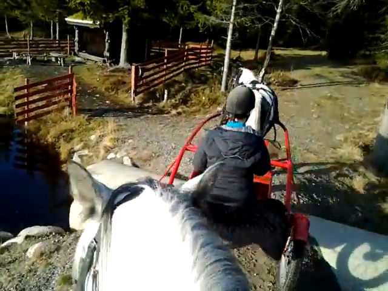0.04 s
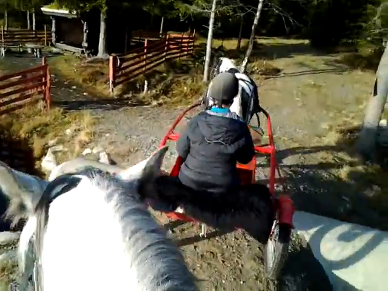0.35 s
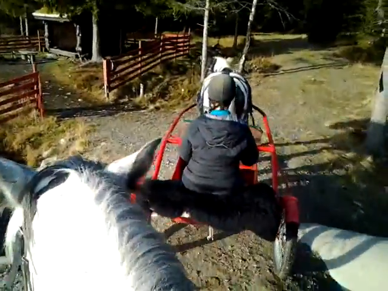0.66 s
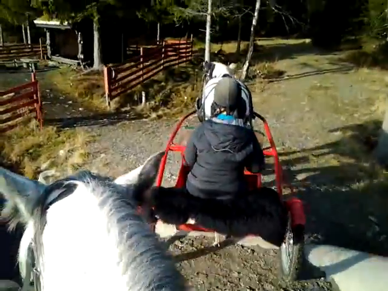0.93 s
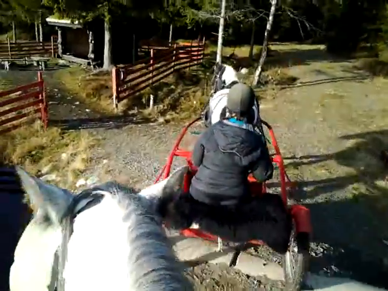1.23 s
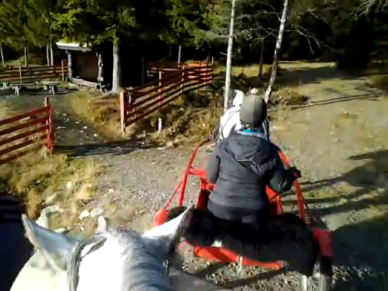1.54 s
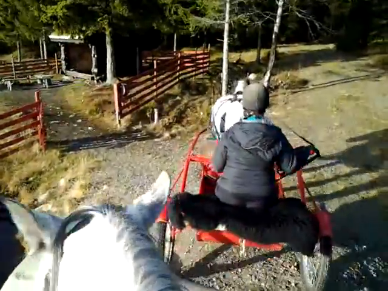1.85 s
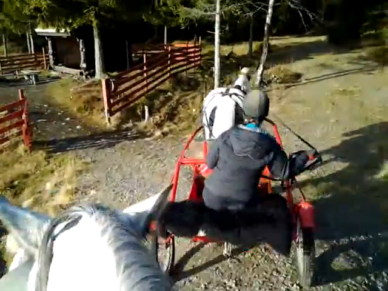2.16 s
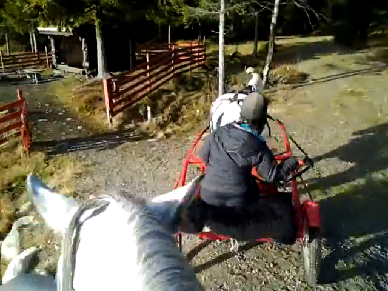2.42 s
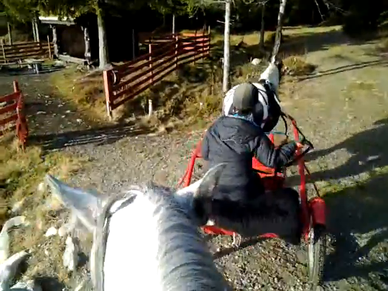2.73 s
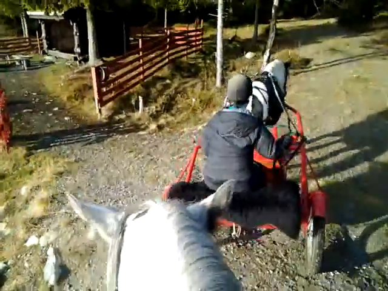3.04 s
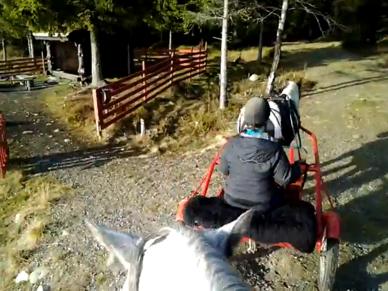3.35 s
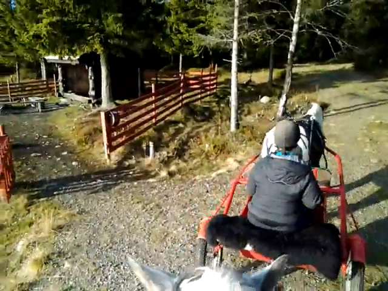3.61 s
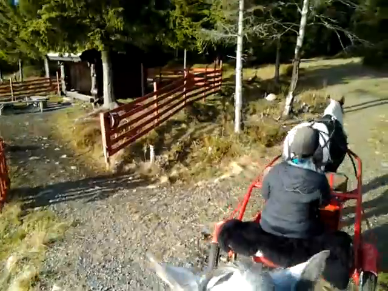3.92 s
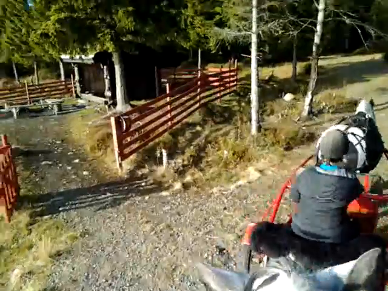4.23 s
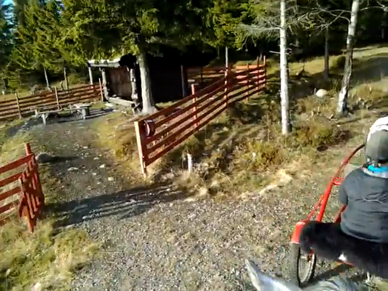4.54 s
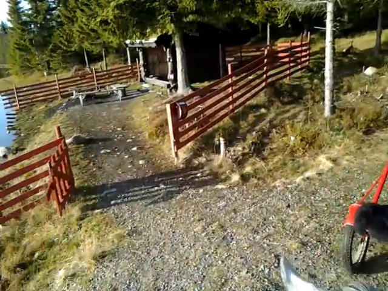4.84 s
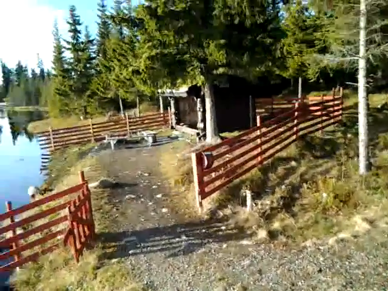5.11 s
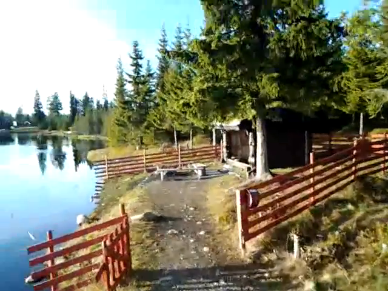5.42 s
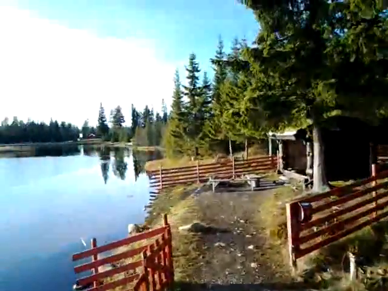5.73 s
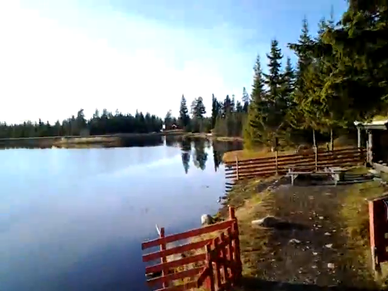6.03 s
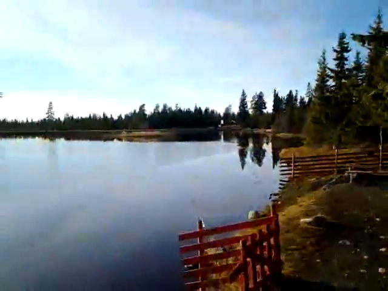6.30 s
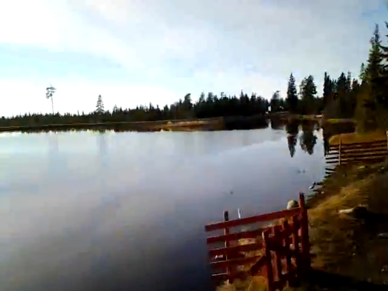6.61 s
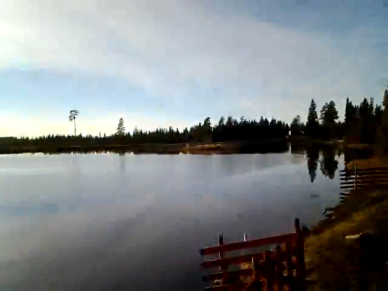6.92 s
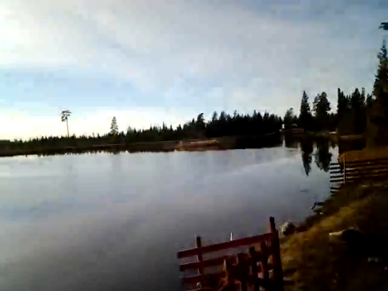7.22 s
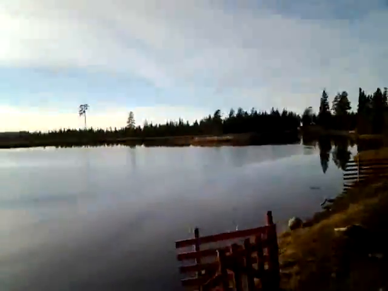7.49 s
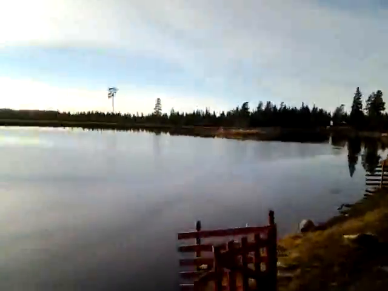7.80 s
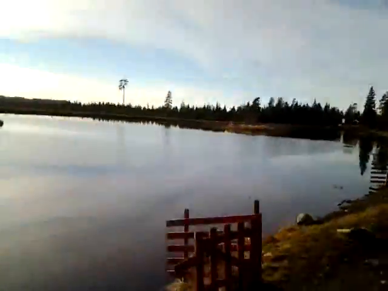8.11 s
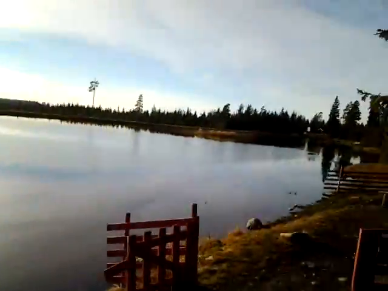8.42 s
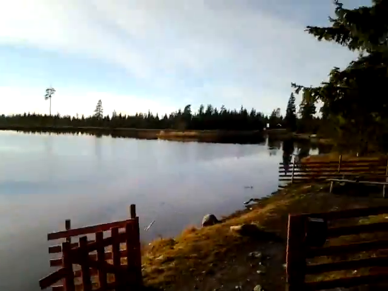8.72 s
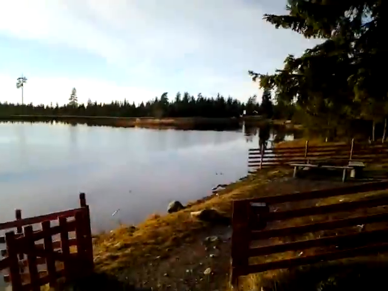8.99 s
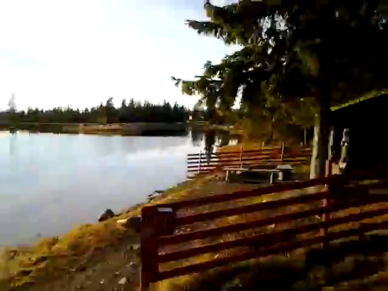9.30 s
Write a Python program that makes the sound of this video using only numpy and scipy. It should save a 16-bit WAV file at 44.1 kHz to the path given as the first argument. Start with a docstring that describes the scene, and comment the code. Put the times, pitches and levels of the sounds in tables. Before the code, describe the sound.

Cart tyres roll over an outdoor gravel path from the start, making a steady, gritty rush dotted with sharp pebble snaps. Hooves knock and crunch into the stones at uneven intervals throughout, with stronger hollow knocks at about 2, 4.1, 6.7 and 9.4 seconds. Water rushes softly underneath. At 3.2 seconds loose metal on the cart gives one light, rattling clank. A few low wind pops touch the microphone from about 4 seconds, and a rumble builds near 5.5 seconds. The tyres then fade slightly as the cart draws away, and the water becomes clearer. Between 6.3 and 8.4 seconds gusts buffet the microphone with fluttering thumps, strongest around 7.5 seconds. The harness gives three faint, very short creaks near 6.8, 7.9 and 9 seconds. The wind eases, while hooves, gravel and water continue to the end at about 9.5 seconds.

```python
"""Horse cart on a lakeside gravel path

Tyres crush grit and snap pebbles aside; hooves knock hollow and crunch into the stones.
Loose metal on the cart clanks once, tack creaks by stick-slip, and the tyres fade as it draws away.
Water rushes at the lake's outlet; wind off the lake buffets the microphone with gusts and eddies."""
import sys
import numpy as np
from scipy import signal
from scipy.fft import rfft, irfft, next_fast_len
from scipy.io import wavfile
from scipy.ndimage import map_coordinates

SR = 44100
rng = np.random.default_rng(int(sys.argv[2]) if len(sys.argv) > 2 else 0)


def transcribe(u):
    """Save the signal u as a 16-bit wav file named by the first command-line argument.

    u: samples, shape (n,) or (channels, n), limited to [-1, 1]; the rate is SR.
    q: integer samples, one column per channel.
    """
    v = np.clip(np.atleast_2d(u).T, -1, 1)
    q = np.round(v * 32767).astype(np.int16)
    wavfile.write(sys.argv[1], SR, q)


N = 421155

# tyre noise: time_s, rolling_db, sand_db
TYRE_LEVELS = [(0.0, -47, -54.5), (0.64, -45.5, -51.5), (1.2, -45.5, -53), (1.62, -43.5, -51.5),
               (1.85, -45.5, -49), (2.15, -44, -49.5), (2.93, -45.5, -53.5), (4.31, -45, -56),
               (4.89, -45.5, -55.5), (5.85, -47, -55), (6.75, -46, -54), (7.24, -49.5, -55.5),
               (8.32, -44, -54), (8.85, -46.5, -54.5), (9.39, -44, -53), (9.55, -43.5, -54.5)]


def amp(db):
    return 10 ** (np.asarray(db) / 20)


def unit_rms(x):
    return x / np.sqrt(np.mean(x ** 2) + 1e-20)


def curves(rows):
    """Each column after time_s, interpolated per sample."""
    times_s, *columns = np.transpose(rows)
    return [np.interp(np.arange(N) / SR, times_s, column) for column in columns]


def wobble(rate_hz):
    """Smooth random curve through knots at rate_hz."""
    knots = rng.standard_normal(int(N * rate_hz / SR) + 4)
    return map_coordinates(knots, [np.arange(N) * rate_hz / SR])


def filtered(x, response):
    """Zero-phase filter with gain response(hz)."""
    size = next_fast_len(N + SR // 2)
    return irfft(rfft(x, size) * response(np.fft.rfftfreq(size, 1 / SR)), size)[:N]


def coloured(x, spectrum):
    """Shape x by (freq_hz, gain_db) points, falling off past both ends; rms 1."""
    freq_hz, gain_db = np.transpose(spectrum)
    freq_hz = np.r_[freq_hz[0] / 2, freq_hz, freq_hz[-1] * 2]
    gain_db = np.r_[gain_db[0] - 20, gain_db, -120]
    return unit_rms(filtered(x, lambda hz: amp(np.interp(np.log(hz + 1), np.log(freq_hz + 1), gain_db))))


def resonance(x, hz, q):
    """Two-pole band-pass."""
    return signal.lfilter(*signal.iirpeak(min(hz, SR / 5), max(q, 0.6), SR), x)


def grains(rate_hz, spread_db):
    """Random tiny impacts of unequal size; rms 1."""
    hits = rng.random(N) < rate_hz / SR
    sizes = amp(spread_db * np.minimum(rng.standard_exponential(N), 3.2))
    return unit_rms(hits * sizes * rng.choice([-1, 1], N))


def add(track, start_s, sound):
    start = max(round(start_s * SR), 0)
    track[start:start + len(sound)] += sound[:N - start]


def ping(modes, pitch_hz, rise_s, crack_db):
    """One short contact: a dry crack and a few damped modes; peak 1."""
    t = np.arange(SR // 25) / SR
    ring = 0
    for ratio, db, t60_s in modes:
        mode_hz = pitch_hz * ratio * (1 + rng.normal(0, 0.055))
        ring += amp(db - 60 * t / t60_s) * np.sin(2 * np.pi * mode_hz * t)
    crack_t60_s = modes[0][2]
    noise = unit_rms(resonance(rng.standard_normal(len(t)), pitch_hz, q=0.61))
    crack = amp(crack_db - 60 * t / crack_t60_s) * noise
    attack = 1 - np.exp(-t / rise_s)
    # contact lasts about a cycle, softening the treble
    contact = resonance((ring + crack) * attack, 1.19 * pitch_hz, q=0.6)
    return contact / np.abs(contact).max()


def distance_loss_db(time_s, leaves_s=5.73, db_per_s=1.3):
    """Tyre sounds fade as the cart draws away."""
    return db_per_s * np.maximum(time_s - leaves_s, 0)


def tyres(roll_gain_db=3.0, sand_gain_db=1.9, lurch_db=1.4, clump_db=4.5):
    """Tyres crush countless grains, which give way in clumps; the load shifts from bump to bump."""
    # rolling noise: freq_hz, gain_db
    roll_spectrum = [(120, -10.5), (220, -7), (330, -3.5), (430, -5), (560, -3), (760, -1.5), (900, -3.5),
                     (1150, -3), (1370, -7.5), (1620, -5), (1850, -8), (2300, -7), (2680, -6.5),
                     (3100, -10.5), (3700, -14.5), (4500, -14), (5800, -15.5)]
    # sand hiss: freq_hz, gain_db
    sand_spectrum = [(2600, -32.5), (3900, -18), (4700, -7.5), (5400, -2.5), (5900, -2), (6500, -4),
                     (7000, -7.5), (7600, -8)]

    def crackle(rate_hz, spread_db):
        return amp(clump_db * np.tanh(wobble(30))) * grains(rate_hz, spread_db)

    rolling_db, sand_db = curves(TYRE_LEVELS)
    shift_db = lurch_db * wobble(22) - distance_loss_db(np.arange(N) / SR)
    grit = unit_rms(crackle(rate_hz=600, spread_db=-0.5))
    for stone_hz in (610, 1010, 1640, 2670):  # one pitch per stone size
        grit += amp(-15.5) * unit_rms(resonance(crackle(rate_hz=120, spread_db=2.0), stone_hz, q=2.5))
    stones = rng.standard_normal(N) + amp(-3) * grit
    sand = rng.standard_normal(N) + amp(-2.5) * unit_rms(crackle(rate_hz=400, spread_db=7.5))
    rolling = amp(rolling_db + roll_gain_db + shift_db) * coloured(stones, roll_spectrum)
    hiss = amp(sand_db + sand_gain_db + shift_db) * coloured(sand, sand_spectrum)
    return rolling + hiss


def water(gain_db=1.0, screened_db=-8, surge_db=4.0, surge_hz=2500):
    """A rush with fine splashes and quick surges, at first screened by the horse and a bridge."""
    # outlet flow: time_s, level_db
    flow_levels = [(0.0, -49.5), (1.57, -42), (3.51, -45.5), (3.93, -50.5), (5.05, -44.5), (5.26, -48.5),
                   (6.44, -47), (6.81, -44.5), (8.99, -42.5), (9.55, -45)]
    # rushing water: freq_hz, gain_db
    rush_spectrum = [(150, -2), (450, -3), (900, -12.5), (1400, -1.5), (1900, -1), (2600, 1), (3300, -1.5),
                     (4300, -2), (5200, -8), (6200, -16.5), (7200, -18)]
    level_db, = curves(flow_levels)
    screen_db = np.interp(np.arange(N) / SR, [3.5, 6.5], [screened_db, 0])
    splashes = rng.standard_normal(N) + amp(-1) * grains(rate_hz=700, spread_db=3.0)
    surge_gain = amp(surge_db * np.tanh(wobble(28)))
    surges = surge_gain * resonance(coloured(rng.standard_normal(N), rush_spectrum), surge_hz, q=1.9)
    rush = unit_rms(coloured(splashes, rush_spectrum) + amp(-4) * unit_rms(surges))
    return amp(level_db + gain_db + screen_db + 0.77 * wobble(14)) * rush


def wind(sway_db=-39, lumps_db=3.0, swell_db=2.4, calm_db=-54):
    """Air on the microphone: slow pressure sway, rumble, and a lumpy flutter in strong gusts."""
    # breeze between gusts: time_s, rumble_db, flutter_db
    breeze_levels = [(0.0, -58.5, -55.5), (1.2, -50, -56), (1.45, -56.5, -58), (1.62, -54, -44),
                     (1.8, -54, -57), (3.1, -54.5, -52), (4.2, -53, -51.5), (4.8, -49, -48.5),
                     (5.4, -45, -51), (5.64, -39.5, -51), (5.85, -34, -40), (6.15, -39.5, -48.5),
                     (6.5, -36, -35.5), (6.7, -38.5, -37), (7.0, -39, -42.5), (7.6, -41, -35.5),
                     (7.9, -38, -37), (8.15, -39, -38.5), (8.35, -35, -36), (8.6, -50, -49),
                     (8.8, -47, -41), (8.97, -46, -50.5), (9.2, -48, -57), (9.55, -40, -52.5)]
    # pressure spectra, each: freq_hz, gain_db
    sway_spectrum = [(2, -16), (8, -3), (12, -10.5), (20, -12), (32, -22), (70, -52.5)]
    rumble_spectrum = [(15, -13.5), (28, -9), (55, -1.5), (90, -5), (160, -17), (400, -47.5)]
    flutter_spectrum = [(50, -19.5), (95, -2.5), (180, -3), (280, -8.5), (400, -15.5), (650, -30.5),
                        (1500, -40.5)]

    def noise(spectrum):
        return coloured(rng.standard_normal(N), spectrum)

    rumble_db, flutter_db = curves(breeze_levels)
    lumps = amp(lumps_db * wobble(55))
    swell = amp(swell_db * wobble(14))
    gust = gust_envelope()
    # flutter needs air fast enough to shed eddies
    shedding = 1 / (1 + amp(calm_db - flutter_db) ** 2)
    rumble_gain = np.hypot(amp(rumble_db - 1) * swell, amp(-16) * gust)
    flutter_gain = np.hypot(amp(flutter_db - 2) * shedding * swell, amp(-2.5) * gust)
    sway = amp(sway_db) * noise(sway_spectrum)
    rumble = rumble_gain * unit_rms(lumps * noise(rumble_spectrum))
    flutter = flutter_gain * unit_rms(lumps * noise(flutter_spectrum))
    return sway + rumble + flutter


def pebble_pops(small_count=70, small_hz=1350, spread_octaves=1.2, rise_s=0.00016, crack_db=-5):
    """Pebbles snap aside: some clear ones, and small random ones whose level follows the tyres."""
    # clear snaps: start_s, peak_db, pitch_hz
    snaps = [(.046, -26.5, 2600), (.355, -31, 1420), (0.691, -22, 2830), (.839, -31, 1460),
             (1.181, -26, 2400), (1.426, -23, 4300), (1.451, -21, 4200), (1.521, -33, 2640),
             (1.74, -28, 2500), (2.029, -23, 5800), (2.144, -25.5, 2070), (2.207, -28, 2390),
             (2.227, -28, 2100), (2.814, -22.5, 2980), (2.832, -27, 3400), (2.842, -31, 3380),
             (3.461, -23, 2720), (3.695, -21.5, 950), (3.815, -27, 1880), (3.897, -28, 1840),
             (4.121, -29, 3250), (4.383, -23.5, 1200), (4.52, -31.5, 1640), (4.547, -31.5, 3090),
             (4.941, -29, 3300), (4.984, -33, 1550), (5.205, -26, 5500), (5.543, -26, 2020),
             (5.968, -25, 2110), (5.982, -22.5, 3290), (6.771, -29, 2490), (6.785, -25, 2380),
             (7.128, -25, 5010), (7.407, -31, 1770), (7.471, -28.5, 2410), (7.666, -28, 2580),
             (7.746, -26, 2570), (7.872, -27, 1770), (7.924, -26, 1810), (7.952, -18, 3210),
             (8.219, -26, 2670), (8.28, -22, 2080), (8.284, -21, 2110), (8.403, -24, 1115),
             (8.6, -27.5, 3200), (8.718, -24.5, 3570), (8.734, -30, 2750), (8.897, -27, 3290),
             (8.938, -26, 2840), (9.291, -27, 2500), (9.4184, -17.5, 2150)]
    # pebble ring: pitch_ratio, level_db, t60_s
    modes = [(0.985, -1, 0.0056), (1.8, -5, .004), (.55, -3, 0.0045)]
    out = np.zeros(N)
    for start_s, peak_db, pitch_hz in snaps:
        add(out, start_s, amp(peak_db) * ping(modes, pitch_hz, rise_s, crack_db))
    rolling_db, _ = curves(TYRE_LEVELS)
    for time_draw, size_draw, pitch_draw in rng.random((small_count, 3)):
        start_s = time_draw * N / SR
        excess_db = 13.5 + 2.2 * min(-np.log(size_draw), np.e)
        peak_db = rolling_db[int(time_draw * N)] + excess_db - distance_loss_db(start_s)
        pitch_hz = small_hz * 2 ** (spread_octaves * (2 * pitch_draw - 1))
        add(out, start_s, amp(peak_db) * ping(modes, pitch_hz, rise_s, crack_db))
    return out


def hoof_clops():
    """The hoof wall meets firm ground, heel and toe apart, and rings hollow."""
    # heel and toe contacts: start_s, peak_db, pitch_hz
    contacts = [(.046, -31.5, 910), (.24, -31, 610), (.364, -31, 1105), (.444, -33, 945),
                (.829, -31.5, 1100), (2.0475, -19, 670), (2.049, -18.5, 1000), (2.0535, -19, 630),
                (2.072, -30, 750), (2.352, -29.5, 670), (2.574, -34, 780), (2.799, -26.5, 686),
                (3.011, -21.5, 825), (3.112, -25.5, 1210), (4.08, -20, 1160), (4.086, -22.5, 447),
                (4.689, -27.5, 904), (4.796, -25, 686), (4.933, -29, 805), (5.048, -24.5, 616),
                (5.085, -26, 796), (5.151, -24.5, 385), (5.476, -32, 900), (5.485, -26, 660),
                (5.4885, -22.5, 698), (6.1977, -24.5, 544), (6.682, -15, 760), (6.694, -19, 530),
                (6.704, -20, 560), (6.7155, -18, 900), (7.456, -25, 643), (7.724, -32, 1050),
                (7.944, -30, 950), (8.249, -24, 760), (8.532, -30, 900), (8.564, -25.5, 1153),
                (8.569, -29, 697), (9.129, -30.5, 480), (9.29, -31, 1080), (9.3795, -26, 706),
                (9.382, -21, 614), (9.395, -23, 860), (9.4, -24, 850)]
    # hoof ring: pitch_ratio, level_db, t60_s
    modes = [(1, 0, 0.01), (1.8, -7.5, 0.00805), (3.7, -14, 0.0049)]
    out = np.zeros(N)
    for start_s, peak_db, pitch_hz in contacts:
        add(out, start_s, amp(peak_db) * ping(modes, pitch_hz, rise_s=0.0005, crack_db=-5.5))
    return out


def hoof_crunches(slip_rate_hz=4000, brush_t60_s=0.19, settle_t60_s=0.35):
    """Each step is a burst of slips between stones: ground thuds, hoof knocks, grit snaps and settles."""
    # steps into gravel: start_s, length_s, knock_db, knock_hz, grit_db, grit_hz
    steps = [(0.238, 0.0061, -40, 640, -64, 3500), (0.356, .023, -45.5, 963, -53.5, 2400),
             (0.691, 0.018, -42, 746, -44, 3050), (1.604, .015, -42, 592, -43.5, 2900),
             (1.66, .04, -44.5, 800, -48.5, 2500), (2.048, 0.0138, -34, 800, -45.5, 2500),
             (2.067, 0.023, -43, 900, -43, 2600), (2.421, 0.0088, -51, 1150, -35, 3250),
             (2.65, 0.025, -41.5, 905, -43, 3400), (2.888, 0.019, -45, 810, -33, 4950),
             (3.112, 0.009, -42, 1210, -55, 2800), (3.371, 0.038, -38, 920, -40, 2430),
             (3.612, 0.016, -38.5, 688, -43.5, 3900), (3.69, 0.027, -43.5, 1070, -41, 3120),
             (4.078, .009, -30, 600, -34, 2350), (4.15, 0.0201, -36.5, 824, -45, 2650),
             (4.779, 0.0021, -28, 910, -34.5, 2750), (4.845, 0.0128, -35, 870, -39.5, 2700),
             (4.934, .0017, -33, 940, -42, 2650), (5.042, 0.015, -34.5, 617, -57.5, 2500),
             (5.077, .018, -38, 880, -48, 2500), (5.156, 0.0087, -38.5, 463, -41.5, 2290),
             (5.195, .02, -38.5, 600, -50, 2200), (5.476, 0.022, -35, 1000, -40.5, 2500),
             (5.731, 0.002, -28, 845, -28, 3380), (5.843, 0.031, -39.5, 825, -46, 3600),
             (6.197, 0.018, -33.5, 700, -39.5, 4200), (6.623, 0.012, -34, 960, -63, 2900),
             (6.69, 0.031, -32, 755, -45.5, 2500), (6.731, 0.014, -40, 950, -46, 2480),
             (6.786, 0.0008, -29, 726, -36, 2800), (6.855, 0.0059, -34, 840, -39, 3300),
             (6.96, 0.027, -46, 700, -48.5, 2600), (7.011, 0.0227, -50, 900, -46, 2600),
             (7.244, 0.017, -42.5, 800, -44, 2600), (7.391, 0.038, -56, 800, -50, 2500),
             (7.533, 0.044, -37.5, 690, -42.5, 2700), (7.727, .018, -52, 1000, -43, 2500),
             (8.24, .019, -38, 758, -42, 2540), (8.554, .02, -40, 950, -57, 2500),
             (8.583, 0.019, -45, 905, -42.5, 3600), (9.001, 0.028, -58, 900, -45, 2500),
             (9.364, 0.0133, -39.5, 950, -44, 2400), (9.379, 0.053, -37.5, 850, -40.5, 2200)]
    # fixed hollow colouring of the steps: freq_hz, q, gain_db
    resonances = [(560, 3.3, -9.5), (1210, 10, -2.5), (2323, 7.3, -8.5)]
    out = np.zeros(N)
    t = np.arange(-SR // 25, SR // 6) / SR
    # loose stones: brushed before the blow, settling after, more so in a long scuff
    loose = amp(np.where(t < 0, -21 + 60 * t / brush_t60_s, -16 - 60 * t / settle_t60_s))
    for start_s, length_s, knock_db, knock_hz, grit_db, grit_hz in steps:
        press = (t >= 0) * np.exp(-(t / length_s) ** 2) + np.sqrt(length_s / 0.0053) * loose
        hits = rng.random(len(t)) < slip_rate_hz / SR
        sizes = rng.standard_normal(len(t)) * amp(2.0 * rng.standard_normal(len(t)))
        slips = hits * sizes * press
        slips[t == 0] += 3  # the blow
        thud = (knock_db - 12, 400, 1)
        knock = (knock_db - 2, knock_hz, 1.42)
        grit = (grit_db + 1.76, grit_hz, 0.65)
        for db, hz, q in (thud, knock, grit):
            burst = resonance(resonance(slips, hz, q), hz, q=0.91)
            add(out, start_s + t[0], amp(db) * burst * np.sqrt(length_s * SR) / np.linalg.norm(burst))
            slips = -slips  # opposite polarity fills the gap between neighbouring bands
    return out + sum(amp(db) * resonance(out, hz, q) for hz, q, db in resonances)


def eddies():
    """Single eddies pop on the microphone: pressure rises ahead of each and drops in its core."""
    # passing eddies: centre_s, level_db, pitch_hz
    passes = [(.71, -34, 45), (3.92, -27, 54.5), (4.376, -24.5, 44), (4.503, -22.5, 99), (4.811, -29, 55),
              (5.036, -27, 49.8), (5.325, -29, 171), (5.49, -30.5, 200), (5.692, -25, 159.7),
              (5.86, -26.5, 55), (6.264, -29, 170), (6.329, -27, 150), (6.355, -20.5, 220),
              (6.405, -18.5, 239), (6.426, -25, 150), (6.522, -28.5, 170), (6.634, -29, 170),
              (6.8, -28, 110), (7.098, -27, 180), (7.127, -27, 200), (7.15, -25, 250), (7.176, -22, 140),
              (7.194, -20.5, 140), (7.272, -17, 220), (7.347, -23.5, 190), (7.429, -17.5, 150),
              (7.458, -15, 230), (7.491, -21, 270), (7.526, -18, 210), (7.552, -15.5, 200),
              (7.581, -19, 150), (7.633, -22, 170), (7.704, -27, 150), (7.743, -22, 158.6),
              (7.874, -28, 200), (7.958, -24, 180), (7.992, -21, 210), (8.051, -20.5, 210),
              (8.258, -23, 169.5), (8.282, -22.5, 180), (8.301, -24, 200), (8.322, -22, 200),
              (8.361, -26, 150), (8.444, -24.5, 190), (8.722, -26, 139.4), (8.836, -28, 151)]
    out = np.zeros(N)
    t = np.arange(SR // 10) / SR
    for centre_s, level_db, pitch_hz in passes:
        position = np.pi * pitch_hz * (t - t.mean())
        pressure = (2 * position ** 2 - 2 * position - 1) / (1 + position ** 2) ** 2.5
        add(out, centre_s - t.mean(), amp(level_db) * pressure)
    return out


def metal_clank(chatter_rad=0.7, crack_db=4, crack_t60_s=0.14):
    """Loose metal strikes and chatters; each contact rings its modes, roughened by the loose fit."""
    # metal contacts: start_s, level_db
    strikes = [(3.2255, -33.5), (3.23, -35.5), (3.233, -46.5), (3.244, -39), (3.252, -53), (3.262, -46.5)]
    # metal ring: freq_hz, level_db, t60_s
    modes = [(880, -1.5, 0.086), (1000, -2, 0.15), (1085, -4.5, 0.24), (1174, -6, 0.55), (1634, 1.5, 0.1),
             (1770, -5, 0.1), (2540, -1, 0.09), (2650, -4, .08), (2756, -1.5, 0.11), (3290, -4, 0.1),
             (3360, -6, .14), (3430, -3.5, 0.25), (5136, -2.5, 0.1), (5310, -4, .06), (5460, -3, .07),
             (5630, -2, 0.07), (6250, -1.5, 0.065), (6481, -2, .08)]
    out = np.zeros(N)
    t = np.arange(SR // 2) / SR
    knots_s = t[::150]
    for start_s, level_db in strikes:
        ring = 0
        for hz, mode_db, t60_s in modes:
            decay = amp(mode_db + rng.normal(0, 3.4) - 60 * t / t60_s)
            phase = 2 * np.pi * (hz * t + rng.random())
            chatter = chatter_rad * np.interp(t, knots_s, rng.standard_normal(len(knots_s)))
            ring += decay * np.sin(phase + chatter)
        noise = unit_rms(resonance(rng.standard_normal(len(t)), hz=7500, q=0.6))
        crack = amp(crack_db - 60 * t / crack_t60_s) * noise
        add(out, start_s, amp(level_db) * (ring + crack))
    return out


def gust_envelope(rise_s=0.022, fall_s=0.023):
    """Each gust rises quickly, holds and drops away."""
    # gusts off the lake: start_s, hold_s, level_db
    gusts = [(6.33, 0.023, -31), (6.406, 0.038, -33), (7.12, 0.095, -28.5), (7.261, 0.025, -28),
             (7.434, 0.13, -28.5), (7.98, 0.022, -33), (8.255, 0.076, -30.5)]
    envelope = np.zeros(N)
    t = np.arange(N) / SR
    for start_s, hold_s, level_db in gusts:
        corners_s = [start_s - rise_s, start_s, start_s + hold_s, start_s + hold_s + fall_s]
        envelope += amp(level_db) * np.interp(t, corners_s, [0, 1, 1, 0])
    return envelope


def tack_creaks(slip_rad=0.6, slip_interval_s=0.0015, upper_ratio=1.78, upper_db=-10):
    """Tack rubs briefly: a wavering stick-slip tone with a weaker upper mode."""
    # rubs: centre_s, level_db, pitch_hz, half_width_s
    rubs = [(6.838, -42, 1720, .005), (7.85, -46, 1600, .025), (9.014, -39, 1875, .02)]
    out = np.zeros(N)
    t = np.arange(-SR // 10, SR // 10) / SR
    knots_s = np.arange(t[0], t[-1], slip_interval_s)

    def tone(hz):
        drift_rad = np.cumsum(rng.normal(0, slip_rad, len(knots_s)))
        return np.sin(2 * np.pi * hz * t + np.interp(t, knots_s, drift_rad))

    for centre_s, level_db, pitch_hz, half_width_s in rubs:
        grip = np.interp(t, knots_s, rng.random(len(knots_s)) + 0.5)
        envelope = np.exp(-(t / half_width_s) ** 2) * grip
        creak = envelope * (tone(pitch_hz) + amp(upper_db) * tone(pitch_hz * upper_ratio))
        creak *= np.sqrt(half_width_s * SR) / np.linalg.norm(creak)
        add(out, centre_s + t[0], amp(level_db) * creak)
    return out


def scene():
    ground = tyres() + pebble_pops() + water()
    horse_and_cart = hoof_crunches() + hoof_clops() + metal_clank() + tack_creaks()
    return (ground + horse_and_cart + wind() + eddies())[None]


def record(dry, knee_hz=6500, limit_hz=7640):
    """Treble rolls off steeply above the knee and ends at the band limit."""
    def treble_gain(hz):
        return 1 / np.sqrt(1 + (hz / knee_hz) ** 24) / (1 + (hz / limit_hz) ** 40)

    return filtered(dry[0], treble_gain)[None]


dry = scene()
out = record(dry)
transcribe(out)
```